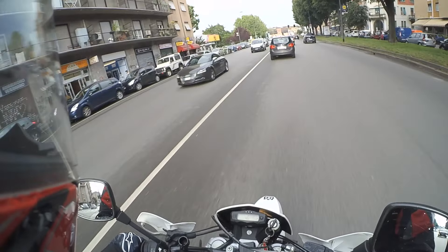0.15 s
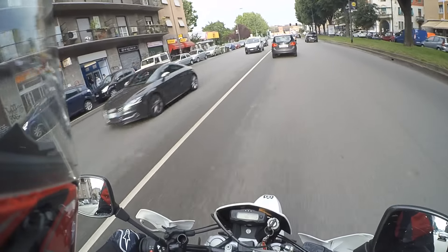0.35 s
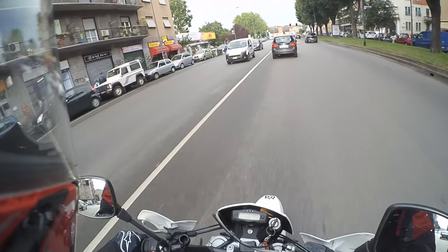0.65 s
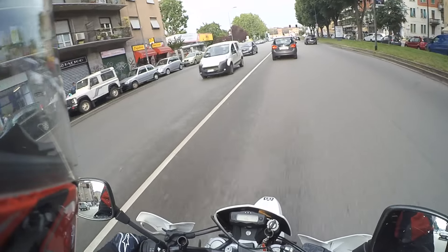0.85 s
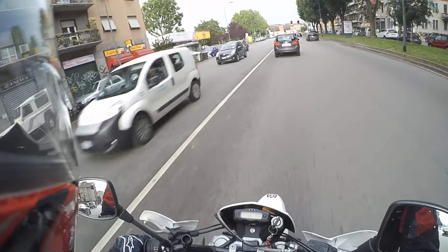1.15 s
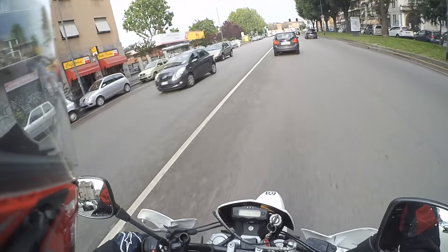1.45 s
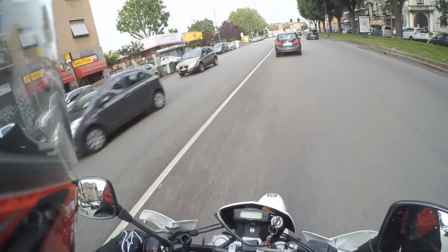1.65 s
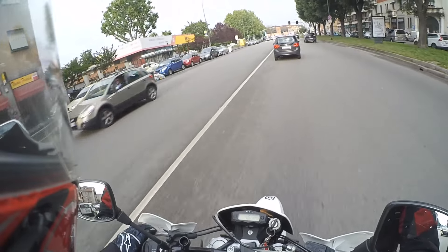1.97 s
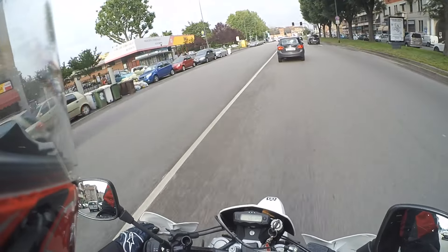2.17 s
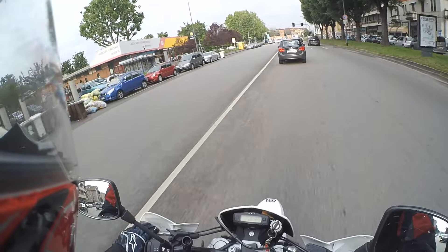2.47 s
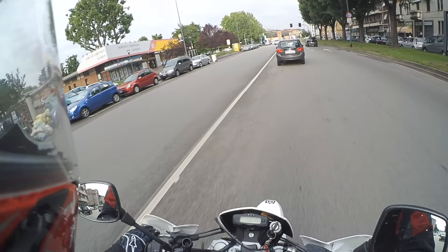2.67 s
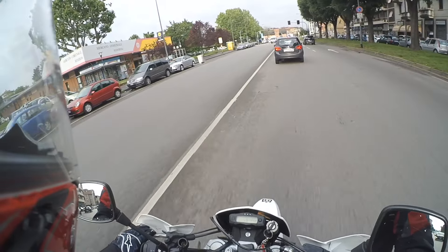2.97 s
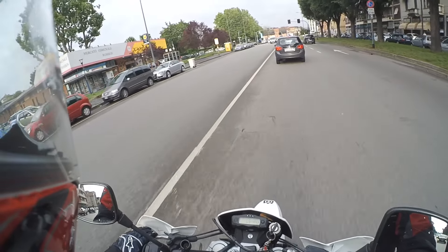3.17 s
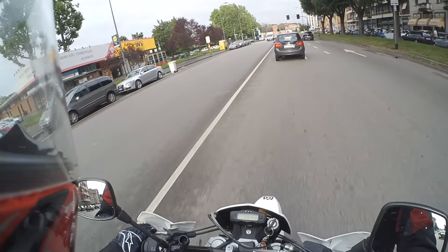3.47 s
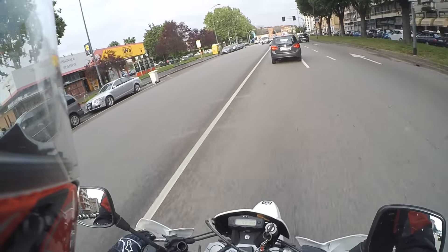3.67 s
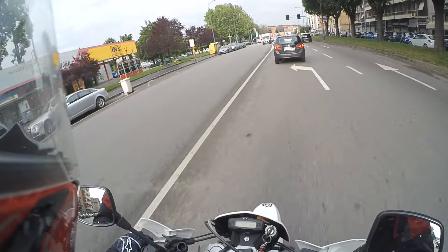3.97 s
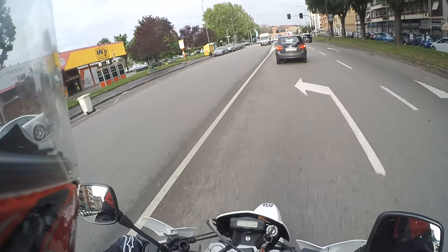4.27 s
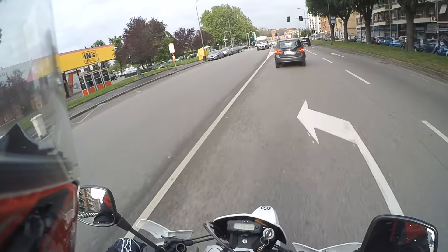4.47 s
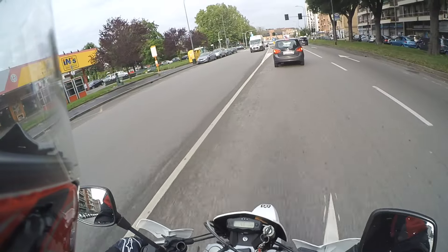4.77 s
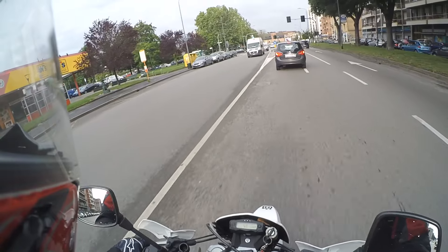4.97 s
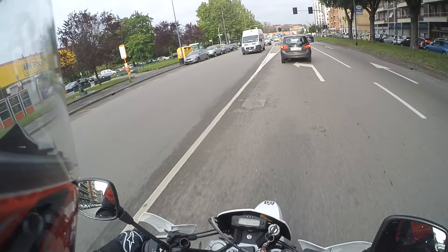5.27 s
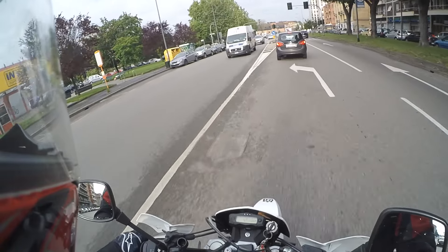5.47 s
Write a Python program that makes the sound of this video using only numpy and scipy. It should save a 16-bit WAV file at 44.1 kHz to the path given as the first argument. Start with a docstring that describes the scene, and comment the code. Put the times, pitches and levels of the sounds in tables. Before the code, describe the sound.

A small single-cylinder motorcycle is heard from the rider's helmet on an open city road, the same in both channels. From 0 to 2.75 s it pulls steadily, a buzzy, droning exhaust note climbing only slightly, with road roar, fine valve rattle and faint thin metallic singing. Deep wind buffets in uneven gusts; oncoming cars add faint brief hisses around 0.5, 1.2, 1.4 and 1.95 s. At about 2.75 s the throttle shuts: the note sags, stumbles with low thuds and dull clacks until 3.2 s, then settles into a much quieter, hollow, wavering overrun hum. Revs drift down as speed falls. From 3.75 to 4.5 s a very high, dry brake chatter ticks irregularly, busiest near 4.3 s, with faint gliding whines. Around 4.5 s a muffled clack precedes soft puttering and easing wind. Revs bottom out near 4.95 s, then climb quickly to the end.

```python
"""A single-cylinder motorcycle engine, heard at the rider's helmet by one microphone: summed multiples of the firing
rate under load, pumping and piston shake on the overrun, resonant pipe puffs while the clutch is in.
It pulls, the throttle shuts, the engine brakes, the front brake chatters, revs drop and a lower gear lifts them.
Shaped noise gives roar, valve rattle, hiss, singing metal, wind and passing cars; pad catches and gearbox clacks
are noise puffs through resonances; thin whines are gliding tones."""
import sys
import numpy as np
from scipy.fft import rfft, irfft, next_fast_len
from scipy.io import wavfile
from scipy.ndimage import map_coordinates

SR = 44100
rng = np.random.default_rng(int(sys.argv[2]) if len(sys.argv) > 2 else 0)


def transcribe(u):
    """Save the signal u as a 16-bit wav file named by the first command-line argument.

    u: samples, shape (n,) or (channels, n), limited to [-1, 1]; the rate is SR.
    q: integer samples, one column per channel.
    """
    v = np.clip(np.atleast_2d(u).T, -1, 1)
    q = np.round(v * 32767).astype(np.int16)
    wavfile.write(sys.argv[1], SR, q)


N = 247842

# engine speed: (time [s], firing rate [Hz])
FIRING_HZ = [(0.0, 45.41), (0.6, 46.09), (1.5, 46.94), (2.4, 47.78), (2.7, 47.88), (2.8, 46.14),
             (2.85, 45.5), (2.93, 45.6), (2.97, 47.8), (3.0, 47.8), (3.05, 46.8), (3.45, 45.95),
             (3.9, 43.8), (4.2, 42.15), (4.35, 40.16), (4.8, 31.77), (4.95, 29.64), (5.1, 31.04),
             (5.25, 34.64), (5.62, 44.5)]
# road speed: (time [s], speed [km/h])
ROAD_KMH = [(0, 49), (2.3, 49.5), (3.4, 44.6), (4.1, 34.6), (5.62, 32.6)]
CRUISE_KMH, CRUISE_HZ = 50, 46.5
# throttle: starts to shut, time taken; stumble length, then settling time
SHUT_S, SHUT_TAKES_S, STUMBLE_S, SETTLE_S = 2.75, 0.046, 0.36, 0.21
# clutch: starts to go in, is in, starts to bite, is home
CLUTCH_S = (4.5, 4.58, 5.2, 5.34)

# exhaust note under load: (multiple of firing rate, relative level [dB])
PULL_ORDERS = [(1, -11.5), (2, -5.5), (3, -9.5), (4, -5.5), (5, 3), (6, -0.5), (7, -6), (8, -11.5), (9, -5),
               (10, -20.5), (11, -12.5), (12, -13.5), (13, -18.5), (14, -24.5), (15, -52), (16, -44),
               (17, -29), (18, -28.5), (19, -33.5), (20, -40), (21, -41.5), (22, -29), (23, -28.5),
               (24, -32), (25, -32.5), (26, -48), (27, -43.5), (28, -47), (29, -34), (30, -39.5),
               (31, -31.5), (32, -35.5)]
# multiples between two pipe resonances, where the pressure changes sign: (multiple)
VALLEYS = [3.5, 7.5, 10.5]
PULL_START_DB, PULL_FADES_DB_PER_S = -26, 0.9
# overrun note: (multiple of firing rate, relative level [dB])
COAST_ORDERS = [(1, -11), (2, -7.5), (3, -5), (4, -3), (5, -15.5), (6, -4.5), (8, -8), (9, -6.5), (10, -14),
                (11, -21), (12, -14.5), (13, -14.5), (14, -23), (15, -35), (16, -31), (17, -27),
                (18, -26.5), (19, -26.5), (20, -39), (21, -49), (22, -27.5), (23, -45), (24, -48),
                (25, -44), (26, -34.5), (27, -43.5), (28, -46), (29, -49), (30, -52.5), (31, -38),
                (32, -28), (33, -43), (34, -41), (35, -31.5), (36, -33.5)]
PUMP_DB, PUMP_CLUTCH_DB = -36.5, -7  # the second is added while the clutch is in
STEADY, UNSTEADY = .7, 2.6  # wander of the overrun note, settled and stumbling
# seventh multiple on the overrun: (time [s], level [dB])
SEVENTH = [(2.8, -49), (3.3, -57), (3.9, -49), (4.4, -44), (4.7, -48.5), (5.05, -44.5), (5.62, -45)]
# tone just above the eighth multiple, perhaps the drive chain; in step with it at BEAT_PEAK_S
BEAT_HZ, BEAT_PEAK_S, BEAT_DB = 2.3, 3.5, -48.5
# piston shake: onset, level, and its fall when firings drop under the knee
SHAKE_S, SHAKE_DB, SHAKE_KNEE_HZ, SHAKE_FALLS_DB_PER_HZ = 3.0, -34.5, 39.1, 1.1
# driveline lurches, each a swell of the shake: (time [s], peak level [dB])
LURCHES = [(2.82, -31.5), (2.915, -32)]
LURCH_S = .034
# exhaust pipe resonances: (centre [Hz], width [Hz], gain [dB])
PIPE = [(222, 38, -0.5), (360, 100, -3.5), (406, 180, -10), (539, 42, -10.5)]
CLUTCH_PUFF_DB = -40.5
# exhaust tone sag as the throttle shuts
SAG_START_S, SAG_END_S, SAG_FROM_HZ, SAG_TO_HZ, SAG_DB = 2.755, 2.815, 245, 180, -35
# thuds on the third multiple: (time [s], peak level [dB])
THUDS = [(2.84, -32), (3.03, -33), (3.16, -31.5)]
THUD_S = 0.031

# roar, rattle, hiss: (level at cruise [dB], power of road speed [-], power of engine speed [-])
RIDE = [(-44, 0.68, 0.53), (-60.5, 1.66, 1.2), (-70.5, 2.4, 1.1)]
# noise spectra: (frequency [Hz], relative level [dB])
ROAR = [(80, -56.5), (200, 4), (450, -1.5), (700, -9), (1100, -12.5), (1500, -19), (2000, -28.5),
        (2800, -31.5), (6000, -120)]
RATTLE = [(1060, -33), (1800, -0.5), (2000, -3.5), (2750, -4.5), (3030, 0.5), (3980, -3.5), (5600, -9.5),
          (6120, -6), (6700, -16), (7500, -16.5), (9750, -43), (16500, -120)]
HISS = [(4120, -24), (7000, -1.5), (8210, -5.5), (9610, -5.5), (10400, -5.5), (14400, -8.5), (15300, -12)]
# ringing metal parts: (centre [Hz], width [Hz], relative level [dB])
METAL = [(1437, 77, 2.5), (1610, 37, -4.5), (2166, 85, -7), (3060, 350, -4), (4480, 1000, 1.5),
         (6000, 140, -21.5), (6300, 100, -23.5)]
# singing of the metal parts together: (time [s], level [dB])
SING = [(0, -68.5), (1, -64), (2.8, -81.5), (3.1, -69), (3.8, -69), (4.1, -64.5), (5.3, -67.5),
        (5.62, -62.5)]

# strongest pad catches: (time [s], strike level before the disc rings [dB])
CATCHES = [(3.8217, -56), (3.914, -52), (3.929, -49), (3.9689, -45), (3.979, -48), (4.005, -49),
           (4.014, -50), (4.0597, -49), (4.073, -49), (4.118, -45), (4.1244, -43), (4.148, -45),
           (4.1999, -48.5), (4.215, -51), (4.231, -49), (4.269, -44), (4.274, -40.5), (4.2976, -43.5),
           (4.3111, -42), (4.343, -55), (4.351, -45.5), (4.36, -49), (4.3767, -48), (4.385, -50),
           (4.4214, -43), (4.4635, -46), (4.494, -53)]
# brake disc resonances: (centre [Hz], width [Hz], gain [dB])
DISC = [(11100, 300, -15), (12000, 470, -9), (13450, 800, 0), (14200, 1100, -5)]
# lever: squeezed, held, eased, let go
LEVER_S = (3.74, 3.98, 4.4, 4.52)
# rub level; mean strike level and mean rate of the chance catches
RUB_DB, CHATTER_DB, CHATTER_PER_S = -76, -59, 34
# gearbox and lever clacks: (time [s], strike level before the cases ring [dB])
CLACKS = [(2.9128, -51), (3.0694, -52), (4.5246, -52), (4.5371, -52), (4.5464, -58)]
# thin whines: (start [s], end [s], middle [Hz], glide [Hz/s], level before WHINE_TRIM_DB [dB])
WHINE = [(0, 1.2, 4425, 10, -75), (0, 1.2, 2950, 20, -76), (1.35, 2.85, 4050, 45, -71),
         (2.45, 3.0, 4420, 0, -77), (2.9, 3.3, 4035, -60, -69.5), (3.2, 3.6, 4420, -50, -76),
         (3.7, 4.15, 3790, 0, -77), (3.75, 4.25, 3270, -100, -77), (3.8, 4.36, 4090, -400, -72),
         (3.98, 4.45, 4440, -400, -73.5), (4.4, 5.05, 3860, -220, -78.5), (4.42, 5.15, 4445, -230, -75),
         (4.56, 5.0, 4240, -200, -77), (4.56, 5.0, 4065, -200, -79), (4.56, 5.0, 4845, -220, -78.5),
         (4.6, 5.1, 4625, -250, -79), (4.68, 4.95, 3060, -200, -78.5), (5.0, 5.5, 4480, -330, -74.5),
         (5.04, 5.45, 4090, -280, -73.5), (5.2, 5.5, 4630, -330, -79), (5.2, 5.55, 2960, -200, -77)]
WHINE_TRIM_DB = -1

# tyre hiss of oncoming cars: (time [s], peak level [dB])
PASSES = [(.46, -70), (1.2, -69), (1.42, -63.5), (1.95, -70.5)]
PASS_S = 0.081
# wind spectrum at the microphone: (frequency [Hz], relative level [dB])
BUFFET = [(1, -12), (3, 0), (12, 0), (25, -7.5), (40, -12.5), (65, -18), (100, -21), (150, -26), (250, -32),
          (500, -44), (900, -72), (2000, -120)]
# wind level between gusts at cruise, and its power of road speed
WIND_DB, WIND_POWER = -24.5, 1.57
# strongest gusts, the early ones pushed by oncoming cars: (time [s], peak level [dB])
GUSTS = [(.1, -19.5), (.51, -19.5), (.86, -29), (1.27, -17.5), (1.4, -24), (1.77, -27), (1.97, -25),
         (2.58, -20), (2.85, -25), (3.15, -24), (3.46, -24.5), (3.58, -20.5), (3.77, -20.5), (4.02, -19.5),
         (4.24, -22.5), (4.43, -27.5), (4.66, -29.5), (4.8, -32), (5.2, -28)]
GUST_S = 0.043
TOP_HZ = 15300


def amp(db):
    """Gain of a level in dB."""
    return 10 ** (np.asarray(db) / 20)


def unit(x):
    """x at rms 1."""
    return x / np.sqrt(np.mean(x ** 2) + 1e-20)


def seconds():
    """Time of each sample."""
    return np.arange(N) / SR


def curve(rows):
    """(time, value) points read at every sample."""
    s, values = np.transpose(rows)
    return np.interp(seconds(), s, values)


def wobble(rate):
    """Smooth random curve, rate knots a second."""
    knots = rng.standard_normal(int(N * rate / SR) + 4)
    return map_coordinates(knots, [np.arange(N) * rate / SR])


def span(start, full, ease, end):
    """0 to 1 and back: rise, hold, release."""
    return np.interp(seconds(), [start, full, ease, end], [0, 1, 1, 0])


def swells(events, width_s):
    """Power of bell-shaped swells at (s, peak dB)."""
    t = seconds()
    return sum(amp(db) ** 2 * np.exp(-((t - s) / width_s) ** 2) for s, db in events)


def filtered(x, response):
    """x times a response of frequency."""
    m = next_fast_len(N + SR // 2)
    return irfft(rfft(x, m) * response(np.fft.rfftfreq(m, 1 / SR)), m)[..., :N]


def coloured(x, spectrum):
    """x through (Hz, dB) points read on a log frequency axis, at rms 1."""
    f, db = np.transpose(spectrum)
    return unit(filtered(x, lambda hz: amp(np.interp(np.log(hz + 1), np.log(f + 1), db))))


def resonant(x, modes):
    """x through parallel (Hz, width Hz, dB) resonances of alternating sign."""
    def response(f):
        total = 0
        for k, (centre, width, db) in enumerate(modes):
            damping = 1j * f * width
            total = total + (-1) ** k * amp(db) * damping / (centre ** 2 - f ** 2 + damping)
        return total
    return filtered(x, response)


def bursts(events, rise_s, t60_s):
    """A short decaying noise puff for each (s, dB)."""
    out, t = np.zeros(N + SR), np.arange(SR // 10) / SR
    for s, db in events:
        envelope = amp(db - 60 * t / t60_s) * (1 - np.exp(-t / rise_s))
        out[round(s * SR):][:len(t)] += envelope * rng.standard_normal(len(t))
    return out[:N]


def throttle():
    """1 while open, 0 when shut."""
    return np.clip(1 - (seconds() - SHUT_S) / SHUT_TAKES_S, 0, 1)


def note(orders, cycles, late, start, valleys, smear, waver_db, drift):
    """Multiples of the firing rate, phased as a burst late in the cycle; smear spreads the burst in time."""
    total = np.zeros(N)
    for k, db in orders:
        flips = np.searchsorted(valleys, k) / 2  # half a turn per valley passed
        turns = k * (cycles - late) + start + flips + smear * k * k
        level = amp(db + waver_db * wobble(13))
        total += level * np.cos(2 * np.pi * turns + drift * k * wobble(20))  # higher multiples drift more
    return unit(total)


def exhaust_pull(cycles):
    """Exhaust pulses under load, coloured by the pipe."""
    return note(PULL_ORDERS, cycles, late=.225, start=.5, valleys=VALLEYS, smear=0, waver_db=1.1, drift=.036)


def overrun_pump(cycles, clutch):
    """Pumping against the shut throttle; the silencer can lifts multiples near its resonances."""
    settle_start_s = SHUT_S + STUMBLE_S
    stumble = span(SHUT_S, SHUT_S + SHUT_TAKES_S, settle_start_s, settle_start_s + SETTLE_S)
    loose = STEADY + (UNSTEADY - STEADY) * np.maximum(stumble, .65 * clutch)
    # the fourth multiple is the piston shake, with its own level
    others = [(k, db) for k, db in COAST_ORDERS if k != 4]
    pump = note(others, cycles, late=.35, start=.06, valleys=[], smear=-.047, waver_db=1.5, drift=.05 * loose)
    can = [(283, 38, -3.5), (357, 53, -7.5), (522, 45, -1.3)]
    return unit(pump + sum(resonant(pump, [mode]) for mode in can))


def piston_shake(cycles, clutch):
    """Fourth-multiple shake: sets in after the shut, weakens at low revs, swells with driveline lurches."""
    tone = np.sqrt(2) * np.cos(2 * np.pi * (4 * cycles + .44))
    waver = amp((.8 + 1.2 * clutch) * wobble(12))
    onset = np.clip((seconds() - SHAKE_S) / SHUT_TAKES_S, 0, 1)
    below_knee_hz = np.maximum(SHAKE_KNEE_HZ - curve(FIRING_HZ), 0)
    settled = onset * amp(SHAKE_DB - SHAKE_FALLS_DB_PER_HZ * below_knee_hz)
    return (settled + np.sqrt(swells(LURCHES, LURCH_S))) * waver * tone


def idle_puffs(cycles):
    """The pipe is struck twice a cycle, unevenly: exhaust valve, then a weaker inlet."""
    uneven = cycles + .027 * wobble(25)
    exhaust = np.diff(np.floor(uneven - .94), prepend=-1)
    inlet = .7 * np.diff(np.floor(uneven - .2), prepend=-1)
    strikes = (exhaust + inlet) * amp(2.5 * wobble(60))
    return unit(resonant(resonant(strikes, PIPE), [(280, 400, 0)]))


def seventh_multiple(cycles):
    """Seventh multiple of the firing rate, wavering in level and phase."""
    level = amp(curve(SEVENTH) + 2 * wobble(14))
    return level * np.sqrt(2) * np.cos(2 * np.pi * (7 * cycles + .5) + .4 * wobble(14))


def chain_tone(cycles, clutch):
    """Tone offset from the eighth multiple, so the two beat; silent once the clutch is in."""
    t = seconds()
    tone = np.sqrt(2) * np.cos(2 * np.pi * (8 * cycles + .25 + BEAT_HZ * (t - BEAT_PEAK_S)))
    return amp(BEAT_DB) * (t < CLUTCH_S[1]) * (1 - clutch) * tone


def engine(cycles):
    """Load note crossfades to overrun as the throttle shuts; firings differ in strength."""
    opened, clutch = throttle(), span(*CLUTCH_S)
    shut = 1 - opened
    strength = map_coordinates(rng.standard_normal(int(cycles[-1]) + 4), [cycles])
    pull_gain = opened * amp(PULL_START_DB - PULL_FADES_DB_PER_S * seconds() + 0.13 * strength)
    pump_gain = shut * amp(PUMP_DB + PUMP_CLUTCH_DB * clutch + 0.29 * strength)
    puff_gain = clutch * amp(CLUTCH_PUFF_DB + 0.8 * strength)
    return (pull_gain * exhaust_pull(cycles)
            + pump_gain * overrun_pump(cycles, clutch)
            + piston_shake(cycles, clutch)
            + puff_gain * idle_puffs(cycles)
            + shut * (chain_tone(cycles, clutch) + seventh_multiple(cycles)))


def stumbling(cycles):
    """A tone sags in pitch as the throttle shuts, then the third multiple swells in thuds."""
    u = np.clip((seconds() - SAG_START_S) / (SAG_END_S - SAG_START_S), 0, 1)
    hz = SAG_FROM_HZ + (SAG_TO_HZ - SAG_FROM_HZ) * u
    sag = amp(SAG_DB) * np.sqrt(2) * np.sin(np.pi * u) * np.sin(2 * np.pi * np.cumsum(hz) / SR)
    thuds = np.sqrt(2 * swells(THUDS, THUD_S)) * np.cos(2 * np.pi * 3 * cycles)
    return sag + thuds


def gate(cycles, depth, sharp, late):
    """Gain over one cycle: a lump on a steady base."""
    return 1 + depth * (.5 + .5 * np.cos(2 * np.pi * (cycles - late))) ** sharp


def singing_metal(ticks):
    """Valve-gated noise rings metal parts, each wavering by itself."""
    total = np.zeros(N)
    for hz, width, db in METAL:
        ring = unit(resonant(rng.standard_normal(N) * ticks, [(hz, width, 0)]))
        total += amp(db + 1.4 * wobble(6)) * ring
    return amp(curve(SING)) * unit(total)


def mechanics(cycles):
    """Road roar pulses with firing, most under load; rattle and hiss tick twice a cycle with the valves."""
    road, revs = curve(ROAD_KMH) / CRUISE_KMH, curve(FIRING_HZ) / CRUISE_HZ
    gains = [amp(db) * road ** by_road * revs ** by_revs for db, by_road, by_revs in RIDE]
    noise = rng.standard_normal((3, N))
    firing = gate(cycles, depth=0.12 + 0.27 * throttle(), sharp=2.4, late=0.15)
    ticks = gate(cycles, depth=0.33, sharp=1.5, late=0.42) * gate(2 * cycles, depth=0.17, sharp=6.7, late=0.25)
    roar = coloured(noise[0] * firing, ROAR)
    rattle = coloured(noise[1] * ticks * amp(0.62 * wobble(150)), RATTLE)
    hiss = coloured(noise[2] * ticks * amp(.8 * wobble(90)), HISS)
    return gains[0] * roar + gains[1] * rattle + gains[2] * hiss + singing_metal(ticks)


def brake():
    """The pad rubs, catches and lets go, ringing the disc very high."""
    rub = unit(resonant(amp(3.7 * wobble(120)) * rng.standard_normal(N), DISC))
    start_s, length_s = LEVER_S[0], LEVER_S[3] - LEVER_S[0]
    draws = rng.random((round(CHATTER_PER_S * length_s), 2))
    chatter = [(start_s + u * length_s, CHATTER_DB + 8 * (v - .5)) for u, v in draws]
    strikes = bursts(CATCHES + chatter, rise_s=0.002, t60_s=0.05)
    return resonant(strikes, DISC) + amp(RUB_DB) * span(*LEVER_S) * rub


def gearbox():
    """Dogs and lever clack, dull through the cases."""
    cases = [(520, 120, 22), (730, 110, 21), (1220, 250, 16), (2600, 350, 8), (5470, 4000, -4)]
    knock = resonant(bursts(CLACKS, rise_s=0.002, t60_s=0.1), cases)
    return filtered(knock, lambda hz: 1 / (1 + 1j * hz / 10000))


def whine():
    """Each streak is a wavering, gliding tone that fades in and out."""
    out, t = np.zeros(N), seconds()
    for start, end, mid_hz, glide, db in WHINE:
        u = np.clip((t - start) / (end - start), 0, 1)
        hz = mid_hz + glide * (end - start) * (u - .5) + 15 * wobble(60) + 5 * wobble(8)
        fade = np.abs(np.sin(np.pi * u)) ** .3 * (u < 1)
        level = amp(db + WHINE_TRIM_DB + 2.4 * wobble(30))
        out += level * fade * np.sqrt(2) * np.sin(2 * np.pi * np.cumsum(hz) / SR)
    return out


def traffic():
    """Each oncoming car swells and fades as a broad hiss."""
    band = [(4300, 3300, 0)]
    hiss = unit(resonant(resonant(rng.standard_normal(N), band), band))
    return np.sqrt(swells(PASSES, PASS_S)) * hiss


def wind():
    """Eddies push on the microphone in uneven lumps, harder with road speed."""
    steady = amp(WIND_DB + 0.91 * wobble(9)) * (curve(ROAD_KMH) / CRUISE_KMH) ** WIND_POWER
    level = np.sqrt(steady ** 2 + swells(GUSTS, GUST_S))
    air = coloured(amp(0.25 * wobble(21)) * rng.standard_normal(N), BUFFET)
    # gusts swell the deep push fully, the flutter above it only in part
    deep = filtered(air, lambda hz: 1 / (1 + (hz / 50) ** 4))
    flutter = air - deep
    return level * deep + amp(2.0) * np.sqrt(level * steady) * flutter


def scene():
    """All sources reach one microphone, sent alike to both channels."""
    cycles = np.cumsum(curve(FIRING_HZ)) / SR
    bike = engine(cycles) + stumbling(cycles) + mechanics(cycles) + brake() + gearbox() + whine()
    return np.tile(bike + traffic() + wind(), (2, 1))


def record(dry):
    """The microphone chain passes nothing above its band limit."""
    return filtered(dry, lambda hz: hz < TOP_HZ)


dry = scene()
out = record(dry)
transcribe(out)
```